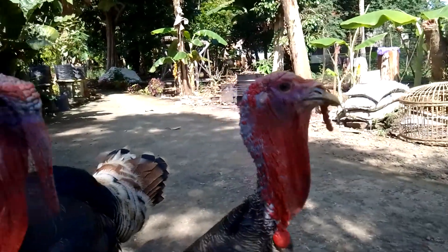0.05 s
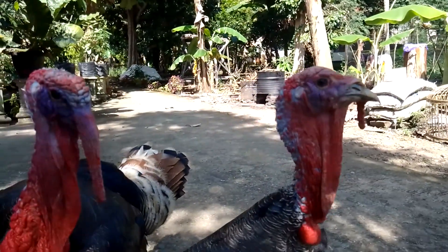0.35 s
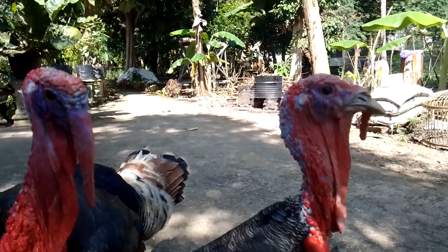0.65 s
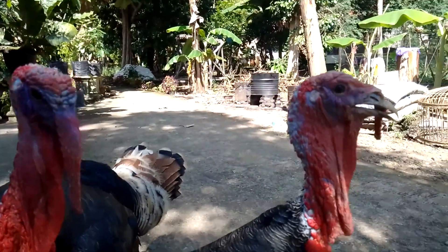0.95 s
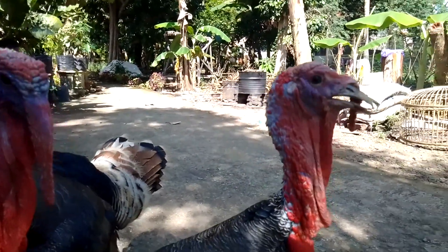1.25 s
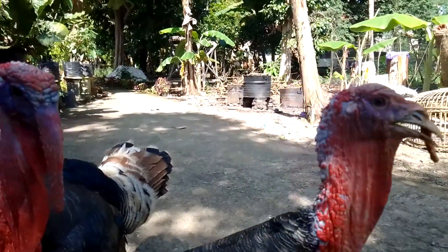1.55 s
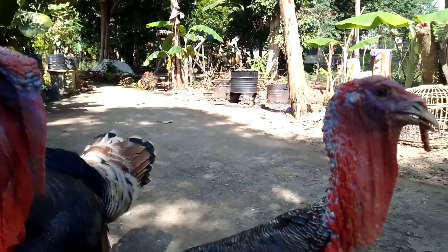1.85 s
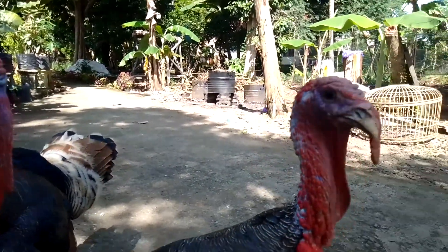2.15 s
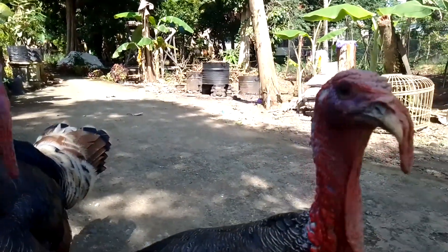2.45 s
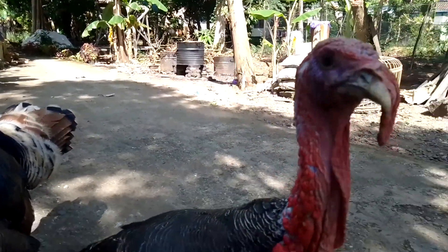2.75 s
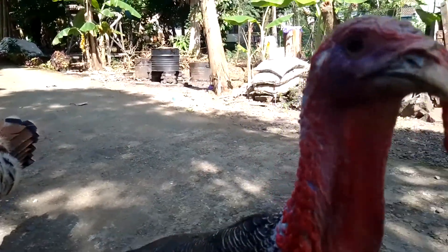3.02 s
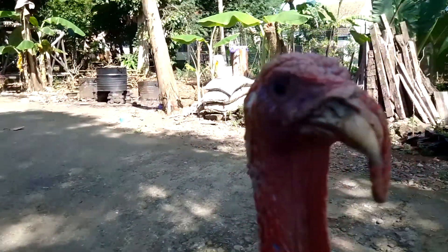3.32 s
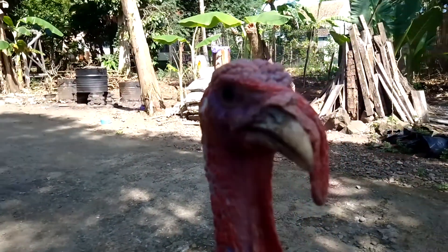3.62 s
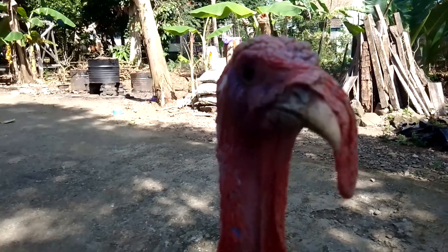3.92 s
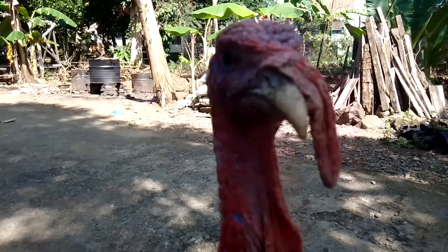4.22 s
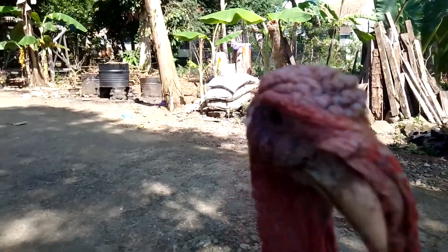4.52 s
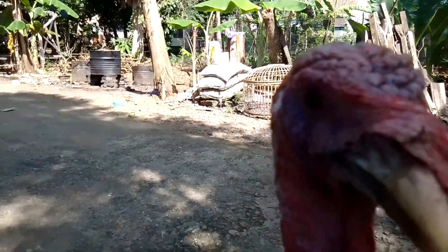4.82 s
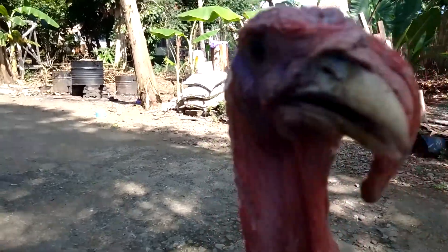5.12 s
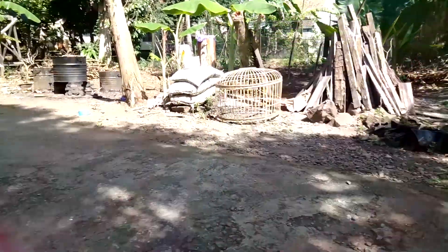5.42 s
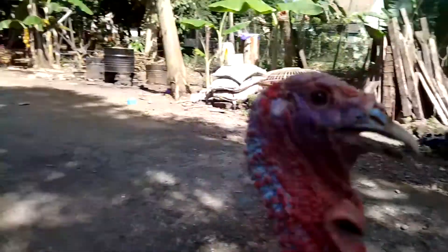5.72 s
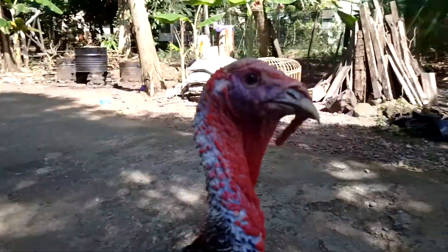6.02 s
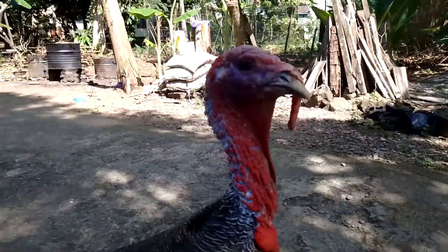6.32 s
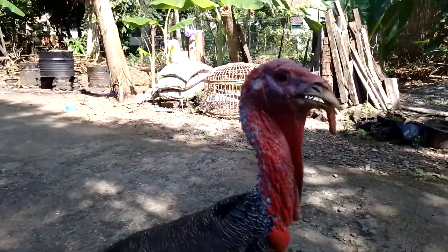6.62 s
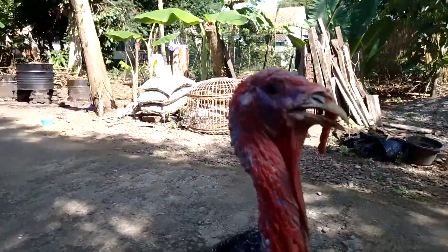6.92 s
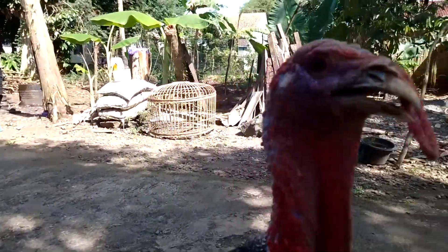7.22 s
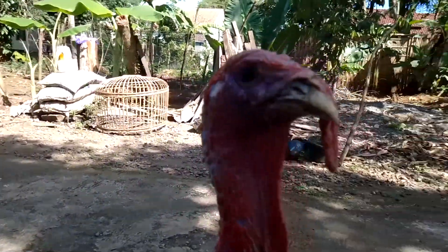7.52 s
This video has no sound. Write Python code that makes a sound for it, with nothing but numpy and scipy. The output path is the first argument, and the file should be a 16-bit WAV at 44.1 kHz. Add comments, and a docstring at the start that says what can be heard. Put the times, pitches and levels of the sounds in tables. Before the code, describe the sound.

In an outdoor yard, close turkeys give a short gobble at once, then four fuller, louder ones, each a fast trill breaking into pops and squeals. Quiet clucks, brushing feathers and small ticks of twigs fill the gaps, and one soft puff of breeze touches the microphone early on. Behind the birds, trees hiss gently, a low hum wavers and a distant dove coos three faint phrases.

```python
"""Turkeys gobble five times right at the microphone in a shaded farmyard, with a few soft clucks between.
Their voice is one reedy tone, a membrane in the syrinx heard through windpipe and beak. A full gobble
is a yelp, a fast warble, then sharp upward pops trailed by falling squeals. Close by, feathers brush
and twigs tick; far off, a dove coos. A faint low hum lies under the hiss of the trees, one puff of
breeze touches the microphone, and the yard gives the birds a short echo."""
import sys
import numpy as np
from scipy import signal
from scipy.fft import rfft, irfft, next_fast_len
from scipy.io import wavfile
from scipy.ndimage import uniform_filter1d, map_coordinates

SR = 44100
rng = np.random.default_rng(int(sys.argv[2]) if len(sys.argv) > 2 else 0)


def unload_audio(sound):
    """Save the sound as a 16-bit wav file, at the path given as the first command line argument."""
    columns = np.transpose(np.atleast_2d(sound))
    # keep every value between -1 and 1, then stretch to whole-number steps
    steps = np.round(np.clip(columns, -1, 1) * 32767)
    wavfile.write(sys.argv[1], SR, steps.astype(np.int16))


N = 342195
TIME = np.arange(N) / SR

# Trees and distant rumble. Each row: frequency in Hz, relative level in dB.
AIR_SPECTRUM = [(20, -9.5), (60, 0), (105, -5.5), (160, -6.5), (330, -17.5), (1000, -23), (2150, -21.5),
                (3200, -31), (4700, -36.5), (6500, -44), (8000, -38), (9600, -52.5), (13000, -62.5),
                (15500, -57)]
# Resonances of a turkey's windpipe and beak. Each row: frequency in Hz, gain in dB.
THROAT = [(250, -24.5), (450, -20), (700, -8), (1050, 0.5), (2080, 5), (2550, -13.5), (3150, -17.5),
          (4000, -5.5), (4450, -8.5), (5300, -21.5), (6800, -28.5), (7900, -17), (10000, -40.5),
          (16000, -41.5)]
# Yelps and pops, where the syrinx bursts open. Each row: time in seconds, level in dB, centre pitch
# in Hz, upward sweep in octaves either side of it, seconds to die away by 60 dB.
POPS = [(.005, -22.5, 1114, 0.84, 0.021), (.171, -25, 965, 0.52, 0.022), (2.0688, -19.5, 1079, 1, 0.024),
        (2.2475, -20.5, 1039, 0.94, 0.026), (3.4855, -21, 1033, 0.28, 0.04),
        (3.8499, -11, 1102, 0.65, 0.024), (4.0261, -18.5, 1043, 0.36, 0.014),
        (5.502, -17.5, 1055, 0.24, 0.035), (5.8492, -15, 1028, 0.91, 0.02), (7.017, -20, 1027, 0.21, 0.038),
        (7.3727, -10, 969, 0.61, 0.043), (7.5472, -14.5, 1018, 0.73, 0.029)]
# The dry sound of feathers and twigs. Each row: frequency in Hz, relative level in dB.
DRY_SPECTRUM = [(2000, -7), (6000, -3), (8000, -4.5), (10000, -16), (15500, -18.5)]
# Feathers brushing. Each row: time in seconds, level in dB, half length in seconds.
RUSTLES = [(.86, -68, 0.044), (1.18, -64, 0.02), (2.27, -72, 0.089)]
# Falling squeals after the pops. Each row: start in seconds, lengths in seconds of the upper register,
# the whole note and the fall, level in dB, lower pitch in Hz, pitch it falls toward in Hz.
SQUEALS = [(0.06, 0.023, 0.052, 0.013, -27.5, 1367, 597), (0.2192, 0.005, 0.024, 0.029, -29.5, 1160, 318),
           (2.1276, 0.012, 0.065, 0.028, -27.5, 1513, 650), (2.303, .037, 0.087, .0224, -25, 1494, 605),
           (3.903, 0.024, 0.057, 0.016, -19.5, 1407, 622), (4.0822, 0.0032, 0.024, 0.03, -23, 1203, 302),
           (5.9233, .0004, 0.043, .0251, -26.5, 1527, 633), (7.4358, 0.014, 0.05, 0.02, -21, 1337, 546),
           (7.6087, 0.016, 0.074, 0.018, -19.5, 1453, 640)]
# Phrases of the far dove. Each row: start in seconds, base level in dB.
DOVE_PHRASES = [(.595, -59.5), (3.385, -61.5), (5.595, -61)]
# One phrase, two short coos and a long rolled one. Each row: seconds into the phrase, length in seconds,
# pitch in Hz, dB above the base level, roll depth from 0 to 1.
COOS = [(0, 0.092, 615, 6.5, 0.7), (0.208, .085, 665, 13.5, .12), (0.494, .46, 706, 7.5, 1)]
# Twigs and grit on the ground. Each row: start in seconds, relative level in dB, brightness in dB.
TICKS = [(.995, -56, -35), (5.229, -50, -38.5), (5.4675, -55.5, -29.5), (5.7893, -52.5, -36),
         (6.1528, -44.5, -35), (6.164, -46, -10), (6.3226, -53, -35), (6.3766, -51.5, -42),
         (7.5847, -45.5, -45), (7.595, -46, -35)]
# Breeze on the microphone. Each row: time in seconds, level in dB, half length in seconds.
PUFFS = [(1.65, -42.5, .04)]
# Soft clucks and peeps. Each row: time in seconds, level in dB, pitch in Hz, half length in seconds.
CLUCKS = [(1.7174, -45, 1155, 0.0045), (4.4707, -37.5, 1042, 0.0089), (4.573, -25.5, 1522, 0.0099),
          (5.525, -41.5, 1390, .013), (7.323, -39.5, 1838, .008), (7.344, -41.5, 1484, .008)]
# The warbling half of a gobble. Each row: start in seconds, lengths in seconds of the whine before it,
# the trill and the whole note, level in dB, swell in dB, upper pitch in Hz, lower pitch in Hz, pitch it
# falls toward in Hz, trill rate in Hz, trill depth in octaves, pulsing in dB, seconds until one beat
# falters, how far it falters from 0 to 1.
WARBLES = [(1.8598, 0.02, 0.11, .15, -28.5, 15, 1345, 1026, 680, 44.1, .16, 0, 0.027, 0.07),
           (3.607, 0.051, .0886, .18, -24, 10, 1285, 1083, 548, 43.1, 0.21, 4, 0.039, 0.27),
           (5.6238, .052, .0935, .168, -26, 6, 1257, 1090, 615, 41.3, .17, 2, .037, .95),
           (7.1394, 0.064, .137, .178, -23.5, 7.5, 1362, 964, 420, 41.36, 0.22, .5, 0.011, .4)]
# The echo of the yard. Each row: frequency in Hz, seconds to die away by 60 dB.
YARD_DECAY = [(300, 0.28), (2000, 0.24), (10000, 0.49)]

TOP_HZ = 15800  # upper limit of the overtones and of the recorder
ONSET_S, BREAK_S = .002, .0049  # blend widths: lead-in to note, upper to lower register


def amp(db):
    """Decibels as a gain."""
    return 10 ** (np.asarray(db) / 20)


def along(points, hz):
    """Read (Hz, value) points on a log frequency axis."""
    knots_hz, values = np.transpose(points)
    return np.interp(np.log(hz + 1), np.log(knots_hz + 1), values)


def filtered(x, response):
    """Shape x by a gain that depends on frequency."""
    size = next_fast_len(N + SR // 2)
    return irfft(rfft(x, size) * response(np.fft.rfftfreq(size, 1 / SR)), size)[:N]


def noise(spectrum):
    """Coloured noise of rms 1, from (Hz, dB) points."""
    x = filtered(rng.standard_normal(N), lambda hz: amp(along(spectrum, hz)))
    return x / np.sqrt(np.mean(x ** 2) + 1e-20)


def wobble(t, rate):
    """A smooth random curve over the times t, rate knots a second."""
    position = (t - t[0]) * rate
    return map_coordinates(rng.standard_normal(int(position[-1]) + 4), [position])


def between(start, end):
    """The sample times of a stretch."""
    return TIME[max(int(start * SR), 0):int(end * SR)]


def add(track, t, sound):
    """Mix a sound in at its sample times."""
    track[np.rint(t * SR).astype(int)] += sound


def bell(x, centre, half_width):
    """A bell curve of height 1."""
    return np.exp(-((x - centre) / half_width) ** 2)


def swells(rows):
    """A gain curve of bell-shaped swells."""
    return sum(amp(db) * bell(TIME, at, half_s) for at, db, half_s in rows)


def blend(before, after, t, at, width_s):
    """A smooth change from one value to another around the time at."""
    return before + (after - before) * (1 + np.tanh((t - at) / width_s)) / 2


def trees(level_db=-54):
    """Air in the trees around the yard, over a distant rumble."""
    return amp(level_db + 1.1 * wobble(TIME, 3.8)) * noise(AIR_SPECTRUM)


def hum(hz=73.3, level_db=-62):
    """A faint low tone that wavers in pitch and level."""
    phase = 2 * np.pi * np.cumsum(hz * (1 + .016 * wobble(TIME, 2.7))) / SR
    return amp(level_db + 2 * wobble(TIME, 6)) * np.sqrt(2) * np.sin(phase)


def syrinx(t, hz, db, slope_db, jitter, flicker_db=5, ring_hz=4070):
    """A vibrating membrane heard through the throat: nearly a sine when high, pulsed and rough when low."""
    hz = hz * (1 + jitter * (1000 / hz) ** 2 * wobble(t, 600))
    phase = 2 * np.pi * np.cumsum(hz) / SR
    harmonic = np.arange(1, 15)[:, None]
    partial_hz = harmonic * hz
    effort = np.clip(db + 27, -10, 10)
    rolloff_db = (slope_db - .23 * effort) * np.log2(harmonic) * (hz / 1000) ** .085  # louder is brighter
    flicker = np.array([wobble(t, 170) * (order > 2) for order in harmonic[:, 0]])
    ring_db = (3.5 + .68 * effort) * bell(partial_hz, ring_hz, 240)  # nasal ring in the beak
    weight = amp(along(THROAT, partial_hz) - rolloff_db + ring_db + flicker_db * flicker)
    weight *= partial_hz < TOP_HZ
    tone = np.sum(weight * np.sin(harmonic * phase), axis=0) / np.sqrt(np.sum(weight ** 2, axis=0) / 2)
    undertone = .47 * jitter * np.sin(phase / 2)  # every other cycle is a little stronger
    shimmer_db = .5 * wobble(t, 300)
    return (tone + undertone) * amp(db + shimmer_db)


def rasp(voice, tilt_db):
    """Turbulent air in the throat follows the strength of the voice, darkened by tilt_db an octave."""
    strength = np.sqrt(np.abs(uniform_filter1d(voice ** 2, size=90)))
    return strength * noise([(hz, db - tilt_db * np.log2(hz / 1000)) for hz, db in THROAT])


def pops(attack_s=.003):
    """The membrane snaps taut and the pitch shoots up: a wide sweep pops harshly, a narrow one yelps."""
    out, harsh = np.zeros(N), np.zeros(N)
    for at, db, hz, sweep, t60 in POPS:
        t = between(at - .008, at + .04)
        age = t - at
        crest_s = .0003 / sweep ** 1.5  # yelps have a rounder peak
        decay_db = -60 * (np.hypot(age, crest_s) - crest_s) / t60
        shape_db = np.where(age < 0, -9 * (age / attack_s) ** 2, decay_db)
        pitch = hz * 2 ** (sweep * np.tanh(age / .00455))
        pop = syrinx(t, pitch, db + shape_db, slope_db=15, jitter=.045)
        add(out, t, pop)
        add(harsh, t, sweep * pop)
        # the throat's second resonance flicks upward more slowly and rings a little longer
        flick_hz = 2 * hz * 2 ** (.93 * sweep * np.tanh(age / .014))
        flick_db = db - 15 + np.where(age < 0, 2, .9) * shape_db
        add(out, t, amp(flick_db) * np.sin(2 * np.pi * np.cumsum(flick_hz) / SR))
    return out + amp(-10.5) * rasp(harsh, tilt_db=5)


def feathers(lag_s=.004, shake_db=-53.5, half_s=.029, cutoff_hz=9500):
    """Feathers brush as the birds shift, and shake as each pop jerks the neck."""
    shakes = [(at + lag_s, db + shake_db, half_s) for at, db, *_ in POPS]
    brushing = (swells(RUSTLES) + swells(shakes)) * noise(DRY_SPECTRUM)
    return filtered(brushing, lambda hz: 1 / (1 + (hz / cutoff_hz) ** 8))


def lower_register(t, turn, hz, quiver_hz=40.76, sag_oct_per_s=1.8):
    """Pitch and level after the voice breaks: both quiver, and the pitch sags as the air runs out."""
    age = np.maximum(t - turn, 0)
    quiver = -np.cos(2 * np.pi * quiver_hz * age)
    return hz * 2 ** (.055 * quiver - sag_oct_per_s * age), .54 * quiver


def break_dip(t, turn):
    """The decibels the voice loses for an instant as it changes register."""
    return 5 * bell(t, turn - .0042, .0035)


def collapsing_note(t, hz, db, last_hz, fall_s, slope_db, croak_hz=472, catch_hz=1290, pure_hz=1420):
    """A wavering note, purest mid-range, whose pitch collapses at the end, at most down to a croak."""
    left_s = t[-1] - t
    fall = np.clip(1 - left_s / fall_s, 0, 1) ** 1.47
    pitch = np.maximum(hz * (last_hz / hz) ** fall, croak_hz)
    speed = np.tanh(np.abs(np.gradient(pitch)) * SR / 15000)
    catch_db = 5 * speed * bell(pitch, catch_hz, 70)  # the voice catches sliding fast past a weak spot
    purity_db = 5 * bell(pitch, pure_hz, 280)
    release_db = 18 * np.clip(1 - left_s / .0091, 0, 1)
    fade = np.clip(np.minimum((t - t[0]) / .012, left_s / .002), 0, 1)
    level = db - catch_db - release_db + 1.97 * wobble(t, 110)
    wavering_hz = pitch * 2 ** (.014 * wobble(t, 90))
    return fade * syrinx(t, wavering_hz, level, slope_db + purity_db, jitter=.027)


def squeals(leap_oct=.5, upper_db=-8.5, lead_db=-24, fade_db_per_s=51.5):
    """A faint, sinking lead-in leaps to the upper register, breaks to the louder lower one and falls."""
    out = np.zeros(N)
    for start, upper_s, length, fall_s, db, lower_hz, last_hz in SQUEALS:
        t, turn = between(start - .032, start + length), start + upper_s
        low_hz, low_db = lower_register(t, turn, lower_hz)
        upper_hz = lower_hz * 2 ** (leap_oct + 2.2 * (turn - t))
        lead_hz = 1560 * 2 ** (4.5 * (start - t))
        hz = blend(upper_hz, low_hz, t, turn, BREAK_S)
        hz = blend(lead_hz, hz, t, start, ONSET_S)
        level = blend(upper_db, low_db - fade_db_per_s * (t - turn), t, turn, BREAK_S)
        level = blend(lead_db, level, t, start, ONSET_S) - break_dip(t, turn)
        add(out, t, collapsing_note(t, hz, db + level, last_hz, fall_s, slope_db=16))
    return out


def dove(roll_hz=52, scoop_oct=.3, attack_s=.032, release_s=.1):
    """Far off, each pure coo scoops up to pitch, then sinks and fades ever faster; a flutter rolls it."""
    out = np.zeros(N)
    for start, base_db in DOVE_PHRASES:
        for offset, length, hz, db, depth in COOS:
            t = between(start + offset, start + offset + length)
            age = t - t[0]
            pitch = hz * 2 ** (-scoop_oct * np.exp(-age / .014) - 1.7 * age ** 2)
            gate = np.clip(np.minimum(age / attack_s, (t[-1] - t) / release_s), 0, 1)
            envelope = gate * amp(base_db + db - 41.5 * age ** 2)
            roll = np.sin(2 * np.pi * np.cumsum(roll_hz * (1 + .05 * wobble(t, 26))) / SR)
            phase = 2 * np.pi * np.cumsum(pitch * (1 + .035 * depth * wobble(t, 120))) / SR
            add(out, t, envelope * (1 + depth * roll) * np.sin(phase))
    return out


def twigs(t60=.018):
    """Twigs and grit tick: each a dry snap with some bright fizz, gone at once."""
    out = np.zeros(N)
    snap, fizz = noise(DRY_SPECTRUM), noise([(5000, -21.5), (13000, -12)])
    for start, db, bright_db in TICKS:
        t = between(start, start + .04)
        grain = (snap + amp(bright_db + .5) * fizz)[np.rint(t * SR).astype(int)]
        add(out, t, amp(db - 4 - 60 * (t - start) / t60) * grain)
    return out


def breeze():
    """A puff of air rumbles on the microphone."""
    return swells(PUFFS) * noise([(10, -16), (40, 6.5), (150, -12), (1500, -96)])


def clucks(rise_oct=.077):
    """Short rounded notes from the syrinx that lift a little in pitch, slightly hoarse."""
    out = np.zeros(N)
    for at, db, hz, half_s in CLUCKS:
        t = between(at - 3 * half_s, at + 3 * half_s)
        progress = (t - at) / half_s
        pitch = hz * 2 ** (rise_oct * progress)
        add(out, t, syrinx(t, pitch, db - 8 * progress ** 2, slope_db=14, jitter=.015))
    return out + amp(-23) * rasp(out, tilt_db=1)


def warbles(whine_hz=1212.3, whine_db=-23):
    """A thin whine swells into a fast trill, louder in its troughs, then breaks low and collapses."""
    out = np.zeros(N)
    for (start, whine_s, trill_s, length, db, swell_db, upper_hz, lower_hz, last_hz,
         trill_hz, depth, pulse_db, falter_s, falter) in WARBLES:
        t, turn = between(start - whine_s, start + length), start + trill_s
        reach = 1 - falter * bell(t, start + falter_s, .013)  # one beat falls short
        trough = np.cos(2 * np.pi * trill_hz * (t - start))
        high_hz = upper_hz * 2 ** (depth * (reach * (1 - trough) - 1))
        high_db = -.24 - swell_db * (turn - t) / trill_s + pulse_db * trough
        low_hz, low_db = lower_register(t, turn, lower_hz)
        hz = blend(high_hz, low_hz, t, turn, BREAK_S)
        hz = blend(whine_hz, hz, t, start, ONSET_S)
        level = blend(high_db, low_db, t, turn, BREAK_S)
        level = blend(whine_db, level, t, start, ONSET_S) - break_dip(t, turn)
        slope_db = blend(15.5, 14.5, t, turn, BREAK_S)
        add(out, t, collapsing_note(t, hz, db + level, last_hz, fall_s=.0186, slope_db=slope_db))
    return out


def yard(x):
    """Echoes scattered from ground, trunks and sheds make a short tail."""
    size = SR // 2
    scatter = rng.standard_normal(size) * np.exp(.42 * rng.standard_normal(size))
    hz, t, spectra = signal.stft(scatter, SR, nperseg=256)
    decay = amp(-60 * t / along(YARD_DECAY, hz)[:, None])
    tail = signal.istft(spectra * decay, SR, nperseg=256)[1]
    return signal.fftconvolve(np.pad(x, (200, 0)), tail / np.linalg.norm(tail))[:N]


def scene():
    """One microphone in the yard: the turkeys close and nearly dry, the far dove half echo."""
    gobbles = warbles() + squeals()
    turkeys = gobbles + amp(-25.5) * rasp(gobbles, tilt_db=6.5) + pops() + clucks()
    far_dove = dove()
    birds = turkeys + amp(-20) * yard(turkeys) + far_dove + yard(far_dove)
    return (birds + feathers() + twigs() + trees() + hum() + breeze())[None]


def record(dry):
    """The recorder keeps nothing above its band limit and adds a small constant offset."""
    offset = -.01
    return filtered(dry[0], lambda hz: hz < TOP_HZ)[None] + offset


dry = scene()
out = record(dry)
unload_audio(out)
```